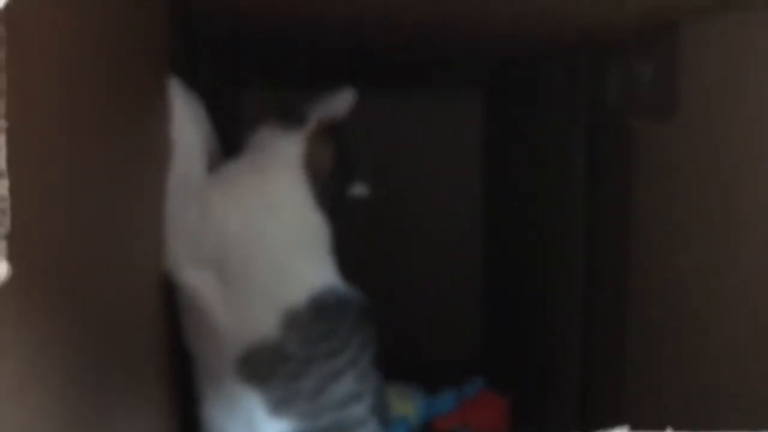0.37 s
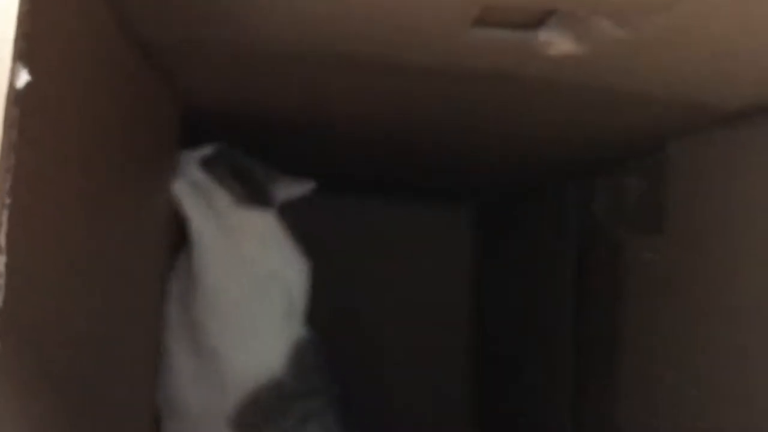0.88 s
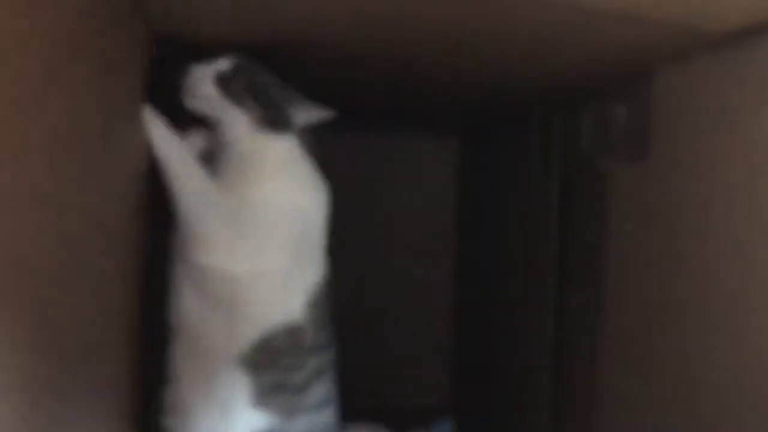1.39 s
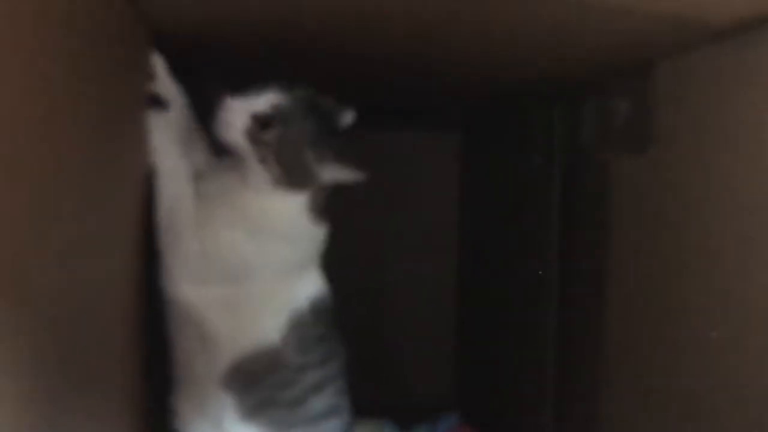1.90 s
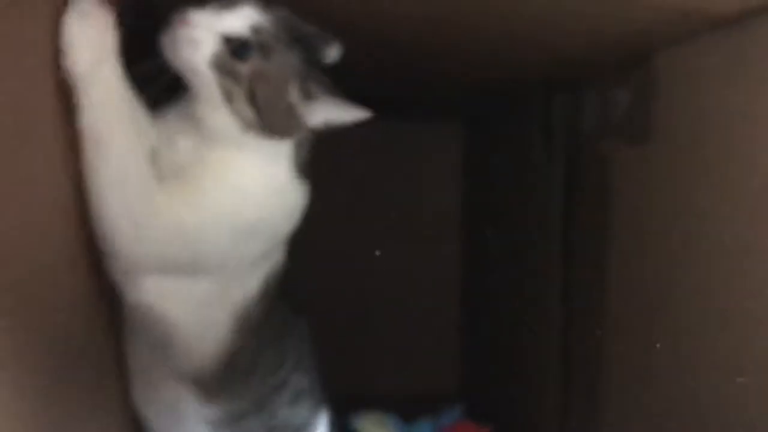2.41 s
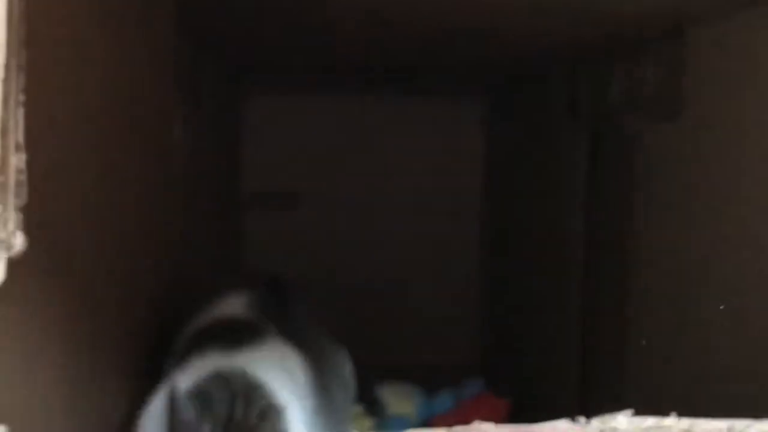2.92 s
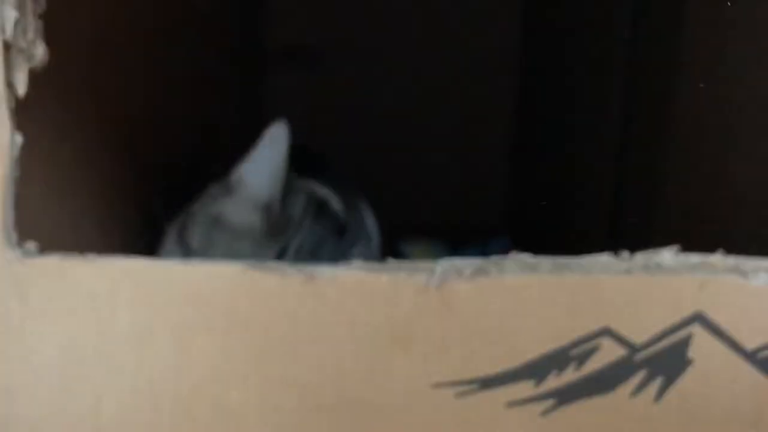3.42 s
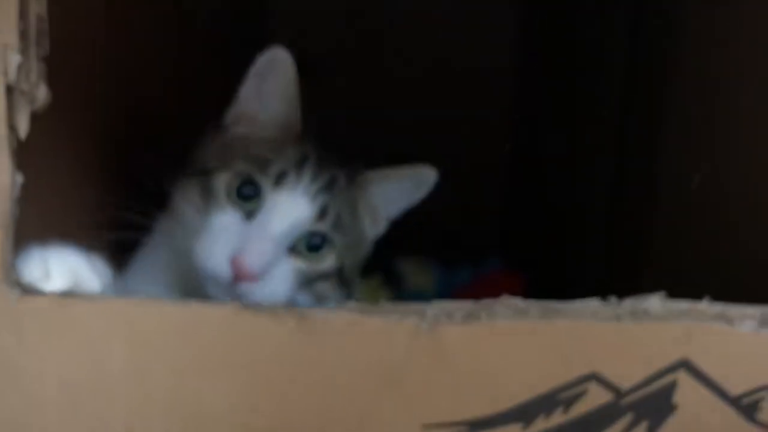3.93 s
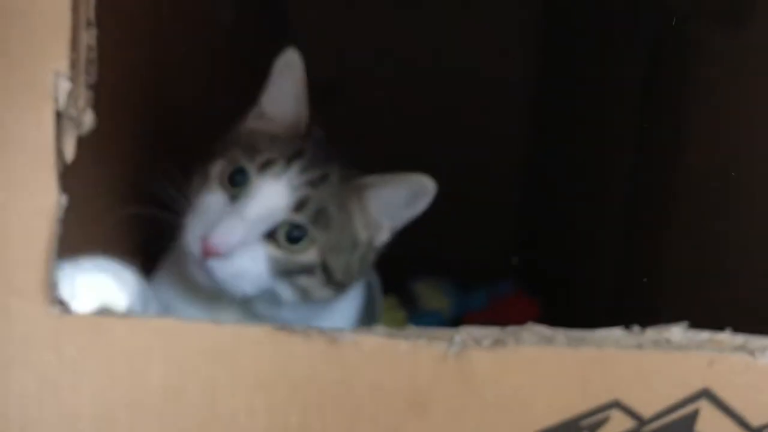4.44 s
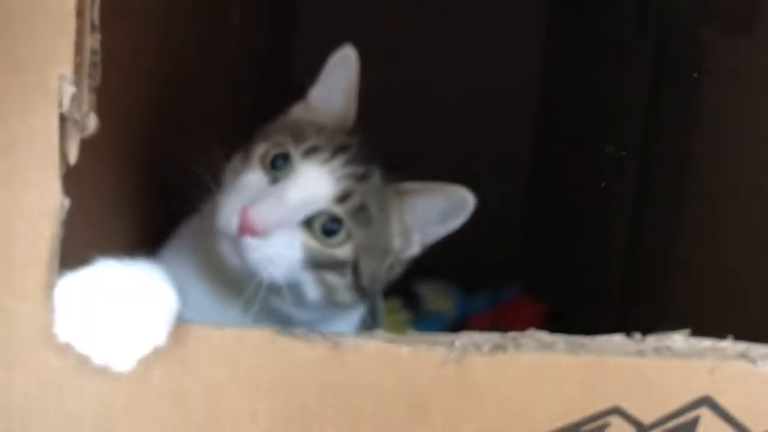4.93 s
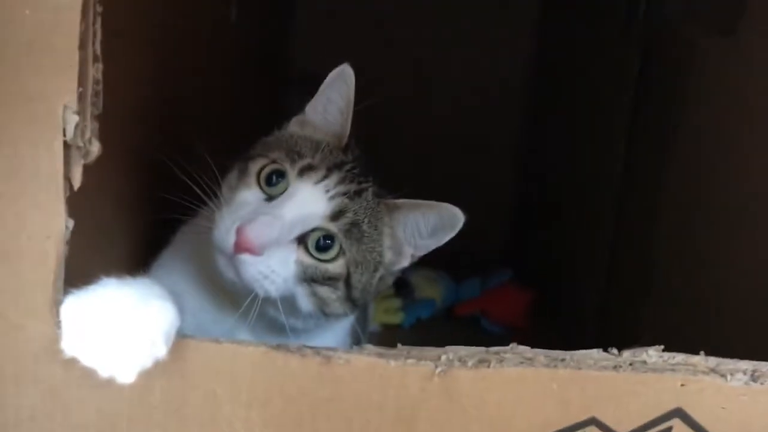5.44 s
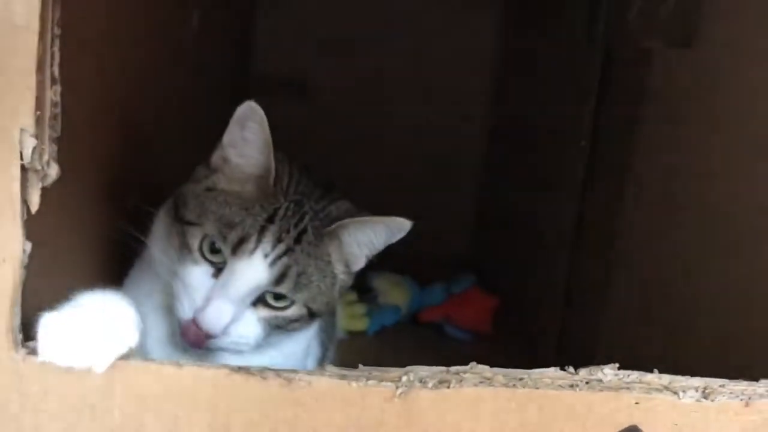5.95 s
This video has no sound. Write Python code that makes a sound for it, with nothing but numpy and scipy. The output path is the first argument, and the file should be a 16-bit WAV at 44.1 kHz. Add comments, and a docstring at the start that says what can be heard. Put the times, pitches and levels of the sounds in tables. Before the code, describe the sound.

Claws scrape and tick on hollow cardboard with soft boxy thumps, a sinking slide down the wall, then sparser scuffs over faint room hiss.

```python
"""Cat pawing inside a cardboard box

A cat paws, claws and slides along the walls of a cardboard box, close to a phone in a quiet room.
Claws and pads scrape the paper skin as shaped rough noise, and claw tips click as short rings.
One paw slides down the wall with a sinking hollow tone; thumps and scraping ring the box's modes.
Beneath lie a low room rumble, hiss and a thin high whine, all made of filtered noise."""
import sys
import numpy as np
from scipy import signal
from scipy.fft import rfft, irfft
from scipy.io import wavfile
from scipy.ndimage import uniform_filter1d

SR = 44100
rng = np.random.default_rng(int(sys.argv[2]) if len(sys.argv) > 2 else 0)


def how_loud(loudness_db):
    """Turn decibels into a plain amplitude multiplier (0 dB gives 1, 20 dB gives 10)."""
    steps = np.asarray(loudness_db, float) / 20
    return 10 ** steps


def dump_mix(stems):
    """Bounce the given channels to the path in sys.argv[1] as a 16-bit WAV at rate SR."""
    frames = np.atleast_2d(stems).T  # one column per channel
    limited = np.clip(frames, -1, 1)  # hard clip at full scale
    pcm = np.round(limited * 32767).astype(np.int16)
    wavfile.write(sys.argv[1], SR, pcm)


N = 268128

# Claws and pads that bite into the paper skin at once.
# Each row: start in seconds, length in ms, relative level in dB, tilt in dB per octave.
CATCHES = [(0.107, 17, -40, 4), (0.137, 15.4, -32, -2.5), (0.247, 27, -52, -3), (0.274, 45, -56.5, 4),
           (0.536, 14.2, -26, -0.5), (0.561, 110, -52.5, -3), (0.658, 27, -44.5, -1), (0.855, 85, -44, 0.3),
           (0.971, 9.4, -21.5, -0.6), (0.988, 27, -45, 5), (1.017, 37, -38.5, 4), (1.064, 12, -37, 13.5),
           (1.225, 88, -57, 0.5), (1.308, 23, -52.5, 2.5), (1.364, 20, -44, 0.5), (1.378, 110, -43.5, 1.3),
           (1.437, 15, -24.5, 0.3), (1.461, 28.4, -40.5, -0.5), (1.553, 37, -47, 3),
           (1.6, 76.6, -43.5, 1.4), (2.107, 23, -46, -5), (2.253, 5.4, -45, -19), (2.295, 30, -36.5, 3.5),
           (2.31, 3.7, -20.5, -10), (2.701, 20, -37, 1.5), (2.841, 17.4, -30, -9.5),
           (2.915, 17, -33.5, -9.5), (2.981, 10.2, -34.5, -7.5), (3.003, 143, -67, -2.5),
           (3.736, 42, -52.5, -0.1), (4.148, 10.2, -27.5, 0.5), (4.159, 8.1, -21, -3.5),
           (4.172, 6, -30.5, -4), (4.4, 130, -55, 8), (4.467, 10, -36, 2.5), (4.479, 6.6, -33.5, 1),
           (4.492, 20, -42.5, 3), (4.509, 10, -52, -1), (4.559, 23.7, -49, -0.6), (4.666, 35, -52.5, 5.5),
           (5.887, 51, -51.5, 7), (5.957, 5.1, -30, 3), (5.966, 23, -43.5, 4.5), (6.071, 4, -30, 3)]
# Fur and pads that brush the skin, swelling as the paw presses.
# Each row: start in seconds, length in ms, relative level in dB, tilt in dB per octave.
BRUSHES = [(0.065, 87, -53.5, -2), (0.495, 57, -48, -1), (0.69, 99, -60.5, -0.5), (0.79, 82, -49.5, -3),
           (1.071, 82, -59.5, -0.5), (1.173, 49, -54, 4), (1.289, 21, -48, 0), (1.329, 51, -50, -2.5),
           (1.77, 44, -62, 0), (2.01, 29, -48, 0), (3.594, 39, -62, 11), (3.774, 74, -68.5, 3),
           (3.87, 118, -59.5, -10), (4.024, 110, -58.5, -1.3), (4.27, 75, -59, 4), (4.345, 46, -49, 3.5),
           (4.622, 47, -55, 8), (5.819, 98, -62.5, 4), (5.942, 18, -44.5, 8), (6.056, 17, -52, 3)]
# Tone of rubbed paper skin. Each row: frequency in Hz, relative level in dB per Hz.
PAPER_TONE = [(410, -27), (700, -2.5), (1730, -4), (4400, -8), (7790, -10), (9480, -12.5), (16000, -19.5)]
# The long slide down the wall. Each row: time in seconds, pressure of the paw in dB.
SLIDE_PRESSURE = [(2.255, -56), (2.3, -44), (2.361, -43.5), (2.42, -43), (2.5, -44.5), (2.555, -41),
                  (2.61, -49.5), (2.68, -44), (2.775, -44.5), (2.8, -71), (2.84, -68)]
# Single claw ticks. Each row: start in seconds, relative level in dB, ring in Hz.
TICKS = [(0.4953, -42, 2760), (0.7168, -40.5, 3960), (0.7479, -29, 2030), (0.8648, -30.5, 2780),
         (0.9065, -32, 2500), (1.367, -33, 2120), (1.372, -28.5, 6200), (1.381, -25.5, 3530),
         (2.981, -27.5, 2970), (3.274, -48, 2810), (3.978, -55, 2750), (4.017, -51.5, 2700),
         (4.3821, -34.5, 4740), (4.479, -24, 4750), (4.725, -47.5, 3000), (4.788, -52.5, 2775),
         (4.884, -56, 6100), (5.475, -41, 2730), (5.5633, -50.5, 2360), (5.69, -34, 3120),
         (5.888, -42.5, 3100)]
# A claw tip dragged over a few fibres. Each row: start in seconds, peak level in dB, ring in Hz.
RASPS = [(1.029, -31.5, 3800), (1.065, -31.5, 7960), (1.214, -39.5, 1120), (1.396, -27, 1400),
         (1.48, -34.5, 5460), (2.768, -28.5, 8600), (2.915, -20.5, 2040), (3.859, -48, 6100),
         (3.878, -51, 2920), (3.892, -51, 5860), (3.907, -50.5, 6100), (4.297, -47, 1100),
         (4.514, -33.5, 1840), (5.932, -40.5, 1000)]
# Paws and body against the walls.
# Each row: time in seconds, relative level in dB, pitch of the panel struck in Hz.
THUMPS = [(0.108, -19, 576), (0.144, -29.5, 170.5), (0.202, -32, 61), (0.541, -18, 185), (0.573, -25.5, 64),
          (0.663, -23, 71.5), (0.665, -26.5, 355), (0.838, -31, 58), (0.921, -22, 67), (0.974, -19.5, 170),
          (0.996, -13, 70.8), (1.031, -24.5, 112), (1.066, -29, 59), (1.441, -21.5, 175.3),
          (1.556, -24, 70.6), (1.619, -34.5, 90), (2.032, -37.5, 115), (2.108, -33.5, 172),
          (2.254, -21, 153), (2.255, -8, 522), (2.312, -15.5, 145), (2.315, -9, 407), (2.346, -17.5, 99),
          (2.371, -20, 85.5), (2.428, -15.5, 594), (2.445, -18, 587), (2.578, -28, 358), (2.703, -22, 356),
          (2.844, -24, 169), (2.845, -5, 468), (2.9, -24, 162), (2.905, -7.5, 610), (2.929, -28, 73),
          (3.738, -31.5, 198), (3.742, -25.5, 424), (3.791, -34, 59), (3.914, -32, 115), (4.149, -25, 190),
          (4.171, -27, 96.4), (4.38, -35.5, 100), (4.471, -26.5, 194), (4.668, -22.5, 67.3),
          (4.7, -46, 105), (5.958, -12, 620), (5.972, -20, 323), (5.965, -27.5, 91.3), (6.073, -23.5, 586)]
# Modes of the box's panels. Each row: frequency in Hz, relative level in dB, T60 in seconds.
PANEL_MODES = [(48.3, -5.5, 0.081), (59, -2.5, 0.29), (81.6, -2, 0.35), (100, 2.5, 0.2), (117.5, -5, 0.24),
               (147.4, 2, 0.15), (170, 0, 0.056), (196.9, -0.5, 0.15), (228, -9.5, 0.1),
               (283, -21.5, 0.053), (357.4, -4.5, 0.054), (437, -15.5, 0.049), (603, -11.5, 0.029),
               (740, -20.5, 0.029), (935, -18.5, 0.028), (1122, -17, 0.035), (1393, -10.5, 0.0083),
               (1630, -14.5, 0.0095)]
# Tone of the room's rumble and hiss. Each row: frequency in Hz, relative level in dB per Hz.
ROOM_TONE = [(20, -9), (60, 4), (85, -7.5), (120, -3.5), (165, -14.5), (250, -16), (500, -25.5),
             (1000, -26), (2000, -31.5), (4000, -34.5), (8000, -37.5), (15600, -35.5)]

BITE_MS, SWELL_SHARE = 2.3, 0.5  # rise of a catch without tilt; part of a brush spent swelling
SOFT_DB_PER_TILT = -0.7  # a duller catch is softer and rises more slowly
BITE_DB, BITE_FADE_MS = 2, 7  # extra level at the start of a stroke
LIFT_DB_PER_LENGTH = 43.5  # a long stroke also dies away slowly
# force into the panels: a duller contact pushes more
CATCH_PANEL_DB, BRUSH_PANEL_DB, PANEL_DB_PER_TILT = 2, 1, -0.11
HOLLOW_START_HZ, HOLLOW_END_HZ = 3100, 1268  # resonance under the sliding paw
SINK_MID_S, SINK_S = 2.53, 0.12  # middle and time scale of its fall
HOLLOW_DB = -1.5
HISS_DB, HISS_DB_PER_S = 0.5, 30.5  # hiss over pressure at mid-sink; it grows as the paw speeds up
RASP_DB_PER_S = 2001.5  # decay of a dragged tip's force
BOX_T60_S, BOX_DB = 0.16, -12  # echo decay at 1 kHz; level of the whole echo
BOX_DB_PER_OCTAVE, BOX_DAMPING = 2.5, 0.43  # the echo shortens by 2 ** damping an octave
ROOM_DB = -60.7
WHINE_HZ, WHINE_T60_S, WHINE_DB = 12900, 0.011, -77


def times(count):
    """Seconds of the first samples."""
    return np.arange(count) / SR


def unit(x):
    """Scales x to rms 1."""
    return x / np.sqrt(np.mean(x ** 2))


def colour(x, points, tilt_db=0):
    """Shapes x by (Hz, dB) points, tilted per octave above about 1.5 kHz; rms 1."""
    hz = np.fft.rfftfreq(len(x), 1 / SR) + 1
    point_hz, point_db = np.transpose(points)
    curve_db = np.interp(np.log(hz), np.log(point_hz), point_db)
    curve_db += tilt_db * np.log2(np.hypot(1, hz / 1500))
    return unit(irfft(rfft(x) * how_loud(curve_db), len(x)))


def ring(x, hz, t60):
    """One decaying mode driven by the force x."""
    decay = np.log(10 ** 3) / (t60 * SR)
    pole = np.exp(2j * np.pi * hz / SR - decay)
    return signal.lfilter([1], [1, -pole], x).imag


def add(out, s, x):
    """Mixes x into out from time s."""
    i = int(s * SR)
    out[i:i + len(x)] += x[:N - i]


def walk(rate, count=N):
    """Random level that glides to a new value rate times a second; rms 1."""
    k = int(SR / rate)
    held = np.repeat(rng.standard_normal(count // k + 1), k)
    return unit(uniform_filter1d(held, k)[:count])


def fibres(count, scatter_db, grip_db):
    """Noise of a rough skin: a few fibres snap harder, and the grip slips unevenly."""
    snaps_db = scatter_db * np.minimum(rng.exponential(size=count), 5.5)
    noise = rng.standard_normal(count)
    grip = walk(250, count=count) + walk(90, count=count)
    return unit(noise * how_loud(snaps_db + grip_db * grip))


def spot(x, ripple_db):
    """Every spot on the wall favours other pitches, so x gets a random ripple of tone."""
    hz = np.linspace(300, 16000, 24)
    return colour(x, np.transpose([hz, ripple_db * rng.standard_normal(len(hz))]))


def strokes():
    """Each stroke swells, sags while it lasts and stops as the paw lifts; gives sound and panel force."""
    air, force, count = np.zeros(N), np.zeros(N), 12000
    ms = times(count) * 1e3
    rows = [(BITE_MS * how_loud(SOFT_DB_PER_TILT * row[3]), CATCH_PANEL_DB, *row) for row in CATCHES]
    rows += [(SWELL_SHARE * row[1], BRUSH_PANEL_DB, *row) for row in BRUSHES]
    for rise_ms, panel_db, s, length_ms, db, tilt_db in rows:
        swell = np.minimum(ms / max(rise_ms, 0.3), 1) ** 0.9
        sag_db = -8.0 * np.clip((ms - rise_ms) / length_ms, 0, 1)
        after_ms = np.maximum(ms - length_ms, 0)
        # the claws let go at once, the fur brushes on a little, in patches
        claws = how_loud(-LIFT_DB_PER_LENGTH * after_ms / (length_ms + 8))
        fur = how_loud(-22.5 - 0.14 * after_ms + 4.9 * walk(45, count=count))
        lift = np.maximum(claws, fur)
        bite_db = BITE_DB * np.exp(-ms / BITE_FADE_MS)  # the first fibres resist hardest
        shape = swell * lift * how_loud(db + sag_db + bite_db)
        effort = np.sum(shape ** 2)
        scrape = fibres(count, 2.6, 2.1)
        # the paw spends a set effort, however the fibres happen to snap
        scrape *= np.sqrt(effort / np.sum((shape * scrape) ** 2))
        first, last = spot(scrape, 2.6), spot(scrape, 2.6)
        # the contact dulls as the stroke runs out
        fresh = np.exp(-np.maximum(ms - rise_ms, 0) / length_ms)
        bright = colour(first, PAPER_TONE, tilt_db)
        dull = colour(last, PAPER_TONE, tilt_db - 4)
        sound = shape * (fresh * bright + (1 - fresh) * dull)
        add(air, s, sound * np.sqrt(effort / np.sum(sound ** 2)))
        add(force, s, how_loud(panel_db + PANEL_DB_PER_TILT * tilt_db) * shape * scrape)
    return how_loud(2.5) * air, force


def slide():
    """The hollow between paw and wall grows, so its resonance sinks; gives sound and panel force."""
    t = times(N)
    pressure = how_loud(np.interp(t, *np.transpose(SLIDE_PRESSURE), left=-200, right=-200))
    hiss = pressure * how_loud(HISS_DB + HISS_DB_PER_S * (t - SINK_MID_S))
    sunk = (1 + np.tanh((t - SINK_MID_S) / SINK_S)) / 2
    scrape = fibres(N, 2.3, 1.5)
    hollow_hz = HOLLOW_START_HZ + sunk * (HOLLOW_END_HZ - HOLLOW_START_HZ)
    phase = 2 * np.pi * np.cumsum(hollow_hz) / SR
    # a noise band around the sinking pitch
    tone = unit(walk(1300) * np.cos(phase) + walk(1300) * np.sin(phase)) * how_loud(4.0 * walk(90))
    # the hollow opens, then the paw flattens
    tone *= np.clip((t - 2.33) / 0.13, 0, 1) * np.clip((2.76 - t) / 0.045, 0, 1)
    # the paw crosses several spots, each coming and going
    scrape = sum(how_loud(7.6 * walk(23)) * spot(scrape, 2.3) for _ in range(5))
    # the colour shifts but the pressure of the paw stays even
    scrape = scrape / np.sqrt(uniform_filter1d(scrape ** 2, size=1500))
    dull = colour(scrape, PAPER_TONE, -0.88)
    bright = colour(scrape, PAPER_TONE, 9.3)
    sound = hiss * bright + pressure * (how_loud(HOLLOW_DB) * tone + how_loud(1.0) * dull)
    return sound, how_loud(-6.0) * pressure * scrape


def ticks():
    """A claw tip lets go: a dry click, repeated by the nearest wall; a dragged tip crackles around its ring."""
    out, tip = np.zeros(N), np.pad(np.hanning(5), (0, 700))
    for s, db, hz in TICKS:
        click = ring(tip, hz, 0.003)
        click = click + how_loud(-2.0) * ring(tip, 1.84 * hz, 0.0013)
        click = click + how_loud(-13.0) * ring(tip, 1200, 0.007)
        add(out, s, how_loud(db + 1.5) * click)
        add(out, s + 0.0034, how_loud(db - 13.0) * click)
    chatter = rng.standard_normal((len(RASPS), len(tip))) * how_loud(-RASP_DB_PER_S * times(len(tip)))
    for (s, db, hz), force in zip(RASPS, chatter):
        rasp = unit(ring(force, hz, 0.005)) + how_loud(-17.0) * unit(force)
        add(out, s, how_loud(db) * rasp / np.max(np.abs(rasp)))
    return out


def box(scrape_force):
    """A soft pad mostly pushes the panel it lands on; scraping shakes stiff high modes more than low ones."""
    s, thump_db, struck_hz = np.transpose(THUMPS)
    polarity = np.sign(rng.standard_normal((len(s), len(PANEL_MODES))))
    out = np.zeros(N)
    for k, (hz, db, t60) in enumerate(PANEL_MODES):
        blows = np.zeros(N)
        # modes far from the struck pitch get less of the blow, down to a floor
        far_db = 150 * min(1, 250 / hz) * np.log2(hz / struck_hz) ** 2
        near_db = -np.minimum(far_db, np.where(hz < struck_hz, 25, 17))
        np.add.at(blows, (s * SR).astype(int), polarity[:, k] * how_loud(thump_db + near_db - 1.5))
        push = np.convolve(blows, np.hanning(49) / 24)[:N]  # the pad softens the blow
        shake_db = np.clip(50 * np.log2(hz / 400), -26, 0) - 18
        out += how_loud(db) * ring(push + how_loud(shake_db) * scrape_force, hz, t60)
    return out


def box_echo():
    """Short echo inside the box: octave bands of decaying noise whose treble dies first."""
    t = times(8192)
    echo = 0
    for hz in 125 * 2 ** np.arange(7):
        band = colour(rng.standard_normal(len(t)), [(hz / 8, -40), (hz, 0), (hz * 8, -40)])
        octaves = np.log2(hz / 1000)
        t60 = BOX_T60_S * 2 ** (-BOX_DAMPING * max(octaves, -1))
        echo = echo + band * how_loud(BOX_DB_PER_OCTAVE * octaves - 60 * t / t60)
    return echo / np.sqrt(np.sum(echo ** 2))


def room():
    """Steady rumble and hiss, and a narrow band of whine that wavers."""
    air = how_loud(ROOM_DB) * colour(rng.standard_normal(N), ROOM_TONE)
    whine = unit(ring(rng.standard_normal(N), WHINE_HZ, WHINE_T60_S))
    return air + how_loud(WHINE_DB + 1.5 * walk(2.9)) * whine


def scene():
    """Scrapes, slide and panels with the echo inside the box, then the dry ticks and the room."""
    scrape, scrape_force = strokes()
    long_scrape, long_force = slide()
    cat = scrape + long_scrape + box(scrape_force + long_force)
    echoed = how_loud(BOX_DB) * signal.fftconvolve(cat, box_echo())[:N]
    return (cat + echoed + ticks() + room())[None]


def band_limit(x):
    """A steep low-pass at the top of the band."""
    return signal.sosfilt(signal.butter(12, 16990, fs=SR, output="sos"), x)


def record(dry):
    """The microphone loses the deepest bass and the extreme top."""
    bass_cut = signal.butter(4, 44, "high", fs=SR, output="sos")
    top_cut = signal.butter(16, 15900, fs=SR, output="sos")
    mix = signal.sosfilt(np.vstack([bass_cut, top_cut]), dry)
    return band_limit(mix)


dry = scene()
out = record(dry)
dump_mix(out)
```